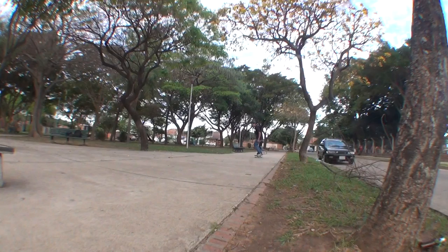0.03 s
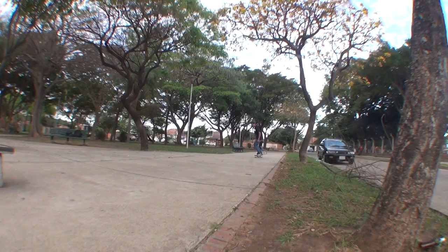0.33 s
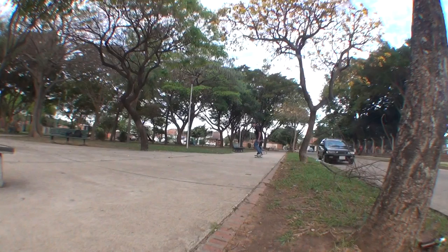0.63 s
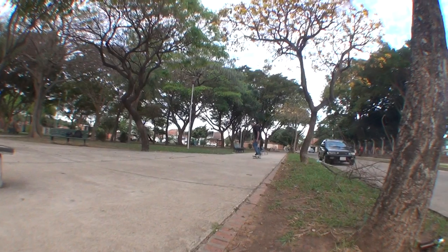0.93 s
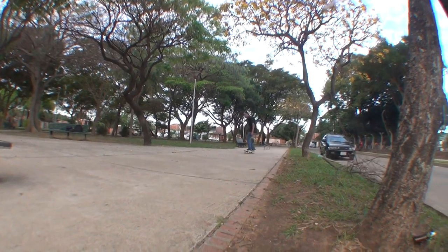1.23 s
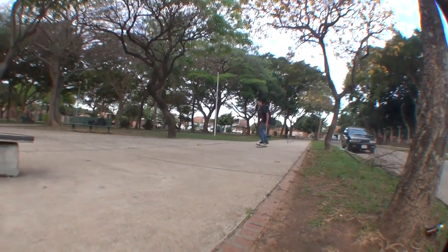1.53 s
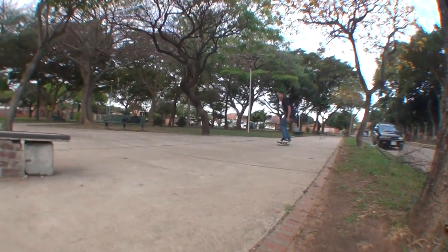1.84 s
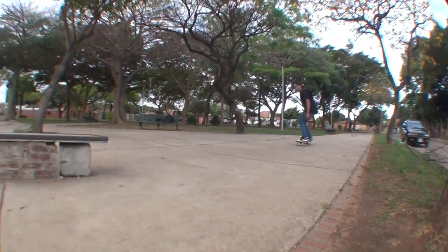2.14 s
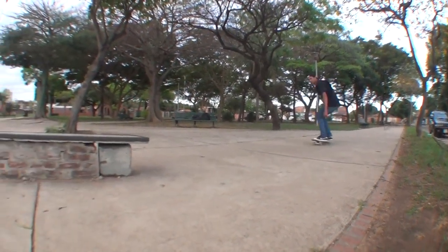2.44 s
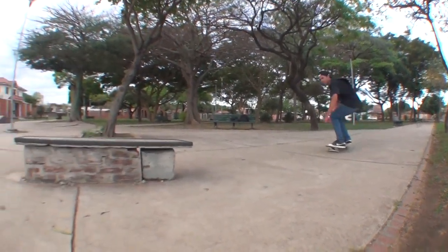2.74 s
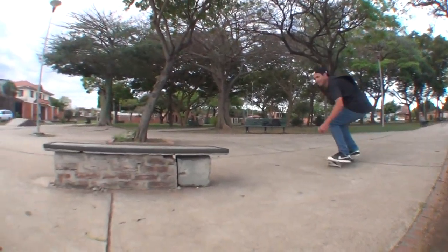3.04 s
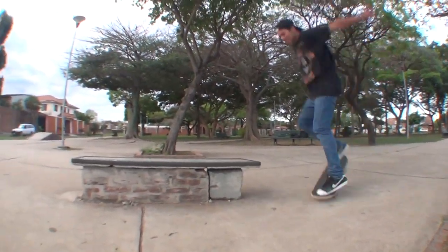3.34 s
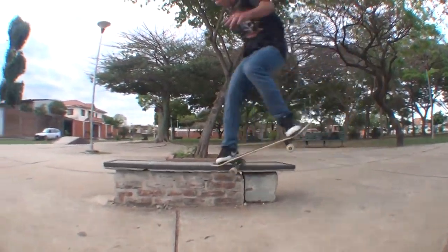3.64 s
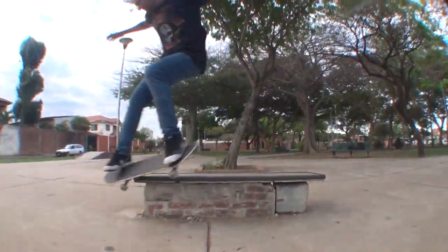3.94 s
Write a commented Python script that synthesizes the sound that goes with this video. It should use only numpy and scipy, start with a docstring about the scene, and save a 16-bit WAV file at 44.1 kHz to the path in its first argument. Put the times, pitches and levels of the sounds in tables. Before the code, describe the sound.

A skateboard rolls closer over concrete, pops up and grinds loudly along a stone ledge.

```python
"""A skateboard rolls closer over concrete paving, jumps and grinds along a stone ledge.
Surface roughness drives wheels and deck into broadband vibration, and the two axles clack across joints.
The deck booms as the rider crouches, the tail pops, a shoe rasps over the grip tape, and the board
slams down and chatters. Friction on the edge excites the resonances of one metal truck.
Short reflections surround the board, and a limiter holds down the loudest blows."""
import sys
import numpy as np
from scipy import signal
from scipy.fft import rfft, irfft
from scipy.io import wavfile
from scipy.ndimage import uniform_filter1d, map_coordinates

SR = 44100
rng = np.random.default_rng(int(sys.argv[2]) if len(sys.argv) > 2 else 0)


def wrap_up_sound(samples):
    """Save the sound to the file named by the first command line argument, as 16-bit audio."""
    columns = np.atleast_2d(samples).T
    # keep every value between -1 and 1, then stretch to whole-number steps
    tamed = np.clip(columns, -1, 1)
    steps = np.round(tamed * 32767).astype(np.int16)
    wavfile.write(sys.argv[1], SR, steps)


N = 176400
T = np.arange(N) / SR


def amp(db):
    """Amplitude ratio of a level in decibels."""
    return 10 ** (np.asarray(db) / 20)


def unit(x):
    """Normalisation to rms 1."""
    return x / np.sqrt(np.mean(x ** 2) + 1e-20)


def decay(t, t60):
    """Exponential damping: 60 dB in t60 seconds."""
    return np.exp(-np.log(1000) * t / t60)


def curves(table):
    """Linear interpolation of each column of a time table at every sample."""
    s, *columns = np.transpose(table)
    return [np.interp(T, s, column) for column in columns]


def read(points, hz):
    """Interpolation on a logarithmic frequency axis."""
    f, value = np.transpose(points)
    return np.interp(np.log(hz + 1e-6), np.log(f), value)


def colour(x, spectrum, centre=1):
    """Zero-phase filtering by a spectrum whose frequencies are multiplied by centre."""
    hz = np.fft.rfftfreq(len(x), 1 / SR)
    return irfft(rfft(x) * amp(read(spectrum, hz / centre)), len(x))


def add(mix, s, sound):
    """Superposition of a sound starting at s seconds."""
    part = mix[round(s * SR):][:len(sound)]
    part += sound[:len(part)]


def waver(depth_db, top_hz):
    """Random modulation: a factor near 1 that fluctuates at rates from 2 Hz to about top_hz."""
    hz = np.fft.rfftfreq(N, 1 / SR)
    slow = rfft(rng.standard_normal(N)) * (hz > 2) / (1 + (hz / top_hz) ** 4)
    return amp(depth_db * unit(irfft(slow, N)))


def grit(per_s, spread_db, share):
    """Shot noise of tiny impacts carries a share of the power; Gaussian rubbing noise carries the rest."""
    impacts = (rng.random(N) < per_s / SR) * rng.choice([-1, 1], N)
    sizes = amp(spread_db * np.minimum(rng.exponential(1, N), 3.7))
    return np.sqrt(share) * unit(impacts * sizes) + np.sqrt(1 - share) * rng.standard_normal(N)


def burst(spectrum, t60, centre=1, size=8192):
    """A struck body with many close modes responds as decaying noise, starting near rms 1."""
    t = T[:size]
    envelope = np.minimum(t / 0.00046, 1) * decay(t, t60)
    noise = colour(rng.standard_normal(size), spectrum, centre)
    return unit(noise * envelope) * np.sqrt(np.mean(envelope ** 2))


def mode(hz, t60, rise_s, size=8192):
    """Free vibration of one mode: a damped sinusoid with a finite rise."""
    t = T[:size]
    return np.sin(2 * np.pi * hz * t) * np.minimum(t / rise_s, 1) * decay(t, t60)


def resonate(drive, modes):
    """Forced vibration of sharp resonances sharing one drive; rms 1."""
    out = np.zeros(N)
    for hz, bandwidth, db in modes:
        pole = np.exp((-np.pi * bandwidth + 2j * np.pi * hz) / SR)
        out += amp(db) * unit(signal.lfilter([1], [1, -pole], drive).imag)
    return unit(out)


def reflections(x, t60, size=16384):
    """Scattering from paving, ledge and trees: convolution with sparse, decaying echoes."""
    t = T[:size]
    signs = rng.choice([-1, 1], size)
    arrivals = (rng.random(size) < 2000 / SR) * (t > 0.002)
    echoes = signs * arrivals * decay(t, t60)
    return signal.oaconvolve(x, echoes / np.linalg.norm(echoes))[:N]


# whirr of the bearings (t/s, level/dB)
WHIRR_LEVELS = [(1.2, -50), (1.7, -58), (2.5, -63.5), (2.9, -48)]
def bearings(centre_hz=4407):
    """Random frequency and amplitude modulation make the bearings' tone wander and swell."""
    hz = centre_hz * waver(depth_db=0.15, top_hz=12) * waver(depth_db=0.25, top_hz=400)
    tone = np.sin(2 * np.pi * np.cumsum(hz) / SR) * waver(depth_db=3, top_hz=22)
    return amp(curves(WHIRR_LEVELS)[0]) * unit(tone)


# spectrum of a sole on grip tape (f/Hz, level/dB)
SHOE_SPECTRUM = [(400, -27), (900, -19), (1300, 3), (2000, -8), (2800, -8), (4400, -12), (6000, -42),
                 (10000, -23), (16000, -40)]
def shoe(start_s=3.46, release_s=3.63, fade_s=0.058):
    """Sliding friction: a sole rasps up the grip tape while the board is in the air."""
    stroke = (T > start_s) * np.exp(-np.maximum(T - release_s, 0) / fade_s)
    rasp = colour(grit(per_s=1100, spread_db=5.5, share=0.9), SHOE_SPECTRUM)
    return amp(-40) * stroke * unit(rasp)


# spectrum of the finest grit (f/Hz, level/dB)
FINE_SPECTRUM = [(3000, -15), (5500, -13), (7300, 4), (8600, 0), (11000, -6.5), (16000, -12.5)]
# lag of a near reflection as the angle to the board changes (t/s, delay/ms)
REFLECTION_DELAY = [(.1, 0.55), (0.9, 0.58), (1.7, 0.41), (2.5, 0.38), (3, 0.335), (3.4, .36)]
def fine_hiss(sand):
    """Interference with a near reflection comb-filters the treble of the grit; rms 1."""
    direct = colour(sand, FINE_SPECTRUM)
    delay_s = curves(REFLECTION_DELAY)[0] / 1000
    reflected = map_coordinates(direct, [(T - delay_s) * SR], order=3)
    return unit(direct + 0.36 * reflected)


# response of wheels and deck (f/Hz, level/dB)
ROAR_SPECTRUM = [(60, -58), (140, -5), (230, 0), (320, 0.5), (400, -6), (490, -9), (640, -6), (800, -10.5),
                 (970, -8.5), (1200, -18.5), (1600, -21), (2200, -28.5), (4000, -32.5), (16000, -96)]
# low drone of the deck within the roar (t/s, gain/dB)
DRONE_GAIN = [(.3, -5.5), (1.4, 0.5), (2.6, 2)]
def roar(drone_top_hz=368):
    """Rough concrete forces wheels and deck to vibrate; the low drone fills in as the board nears."""
    ground = grit(per_s=2500, spread_db=4.5, share=0.45) * waver(depth_db=0.88, top_hz=32)
    vibration = unit(colour(ground, ROAR_SPECTRUM))
    hz = np.fft.rfftfreq(N, 1 / SR)
    drone = irfft(rfft(vibration) / (1 + (hz / drone_top_hz) ** 10), N)
    return vibration + (amp(curves(DRONE_GAIN)[0]) - 1) * drone


# the approach (t/s, rumble level/dB, roar gain/dB, hiss level/dB, fine hiss level/dB, leftward pan/dB)
ROLL = [(.07, -40.5, -33.5, -49.5, -62.5, -2.5), (.3, -36, -31, -48, -59.5, -2.5),
        (.55, -39, -30, -47, -58.5, -3), (.9, -39, -29, -46.5, -58.5, -3),
        (1.25, -36, -30.5, -43, -58, -3.5), (1.6, -38.5, -31.5, -47.5, -58, -4),
        (2.05, -37, -31.5, -45, -57.5, -5.5), (2.55, -35.5, -29.5, -44, -53, -7.5),
        (2.9, -35.5, -29, -42.5, -49, -9), (3.25, -33, -29.5, -45, -47.5, -7),
        (3.45, -40.5, -31, -38.5, -51, -7), (3.62, -36.5, -38, -43.5, -67, -3.5),
        (4, -63, -40.5, -60, -60, -2)]
# spectra of the low rumble and of grit under the wheels (f/Hz, level/dB)
RUMBLE_SPECTRUM = [(30, -48), (58, -3.5), (72, -4), (95, -1.5), (120, 1), (160, -7), (230, -4), (400, -48),
                   (1000, -78)]
HISS_SPECTRUM = [(400, -1), (1500, 1.5), (2200, -4), (2800, -3), (3600, -5.5), (4300, -0.5), (5000, -8.5),
                 (5600, -5), (6400, -13), (9000, -23.5), (16000, -49)]
# scuffs over coarse patches (t/s, half-length/s, level/dB)
SCUFFS = [(0.277, 0.031, -39.5), (0.402, .008, -38.5), (1.083, 0.02, -36), (2.64, 0.01, -38.5)]
def rolling():
    """Rolling noise from surface roughness: rumble, roar and hissing grit, with the bearings' whirr."""
    rumble_db, roar_db, hiss_db, fine_db, _ = curves(ROLL)
    sand = grit(per_s=2500, spread_db=4.5, share=0.33) * waver(depth_db=1.27, top_hz=25)
    scuffs = sum(amp(db) * np.exp(-((T - s) / half) ** 2) for s, half, db in SCUFFS)
    hiss = np.hypot(amp(hiss_db), scuffs) * unit(colour(sand, HISS_SPECTRUM))
    rumble = amp(rumble_db) * unit(colour(rng.standard_normal(N), RUMBLE_SPECTRUM))
    return rumble + amp(roar_db) * roar() + hiss + amp(fine_db) * fine_hiss(sand) + bearings()


# boom of the deck under the crouching rider (t/s, level/dB)
BOOM_LEVELS = [(2.95, -43), (3.03, -29.5), (3.09, -31.5), (3.16, -25.5), (3.19, -40), (3.24, -22.5),
               (3.29, -36), (3.37, -67)]
def crouch(high_hz=166.9, low_hz=124.8, sag_start_s=3.07, sag_hz_per_s=530):
    """A mode of the loaded deck booms unevenly, its frequency sagging as the rider sinks."""
    hz = np.clip(high_hz - sag_hz_per_s * (T - sag_start_s), low_hz, high_hz)
    hz *= waver(depth_db=0.5, top_hz=40.4)
    boom = np.sin(2 * np.pi * np.cumsum(hz) / SR) * waver(depth_db=1, top_hz=35)
    return amp(curves(BOOM_LEVELS)[0]) * (T > BOOM_LEVELS[0][0]) * unit(boom)


# axles crossing joints (t/s, second wheel's lag/s, thump f/Hz, thump level/dB, clack f/Hz,
# clack level/dB, metal tick level/dB, knock t60/s, truck ring f/Hz)
JOINTS = [(0.6604, 0.0034, 503, -31, 1030, -13.5, -23, 0.025, 4540),
          (0.7677, 0.0036, 624, -32, 1600, -17, -22.5, 0.052, 4480),
          (1.3950, 0.0079, 309, -9, 1020, -16, -24, 0.01, 4250),
          (1.5080, 0.0026, 209, -16.5, 836, -18.5, -26, 0.023, 4340),
          (2.1601, 0.0015, 365, -12.5, 1020, -20, -50, 0.022, 4400),
          (2.2834, 0.0012, 324, -12, 1740, -19, -44, .003, 4400),
          (2.4105, .002, 304, -20, 1570, -20.5, -29.5, 0.015, 5750),
          (2.9661, 0.0072, 300, -13.5, 1000, -16, -32.5, .015, 4500),
          (3.0975, 0.0082, 270, -11.5, 864, -12.5, -27, 0.01, 4540)]
# spectrum of a wheel's clack (f/centre frequency, level/dB)
CLACK_SPECTRUM = [(.1, 3), (.4, 5), (.75, 3), (1, 7), (1.25, -7.5), (1.8, -15), (3.5, -17.5), (16, -46)]
# spectra of a metal tick and of a sharp crack against paving or ledge (f/Hz, level/dB)
TICK_SPECTRUM = [(800, 18.5), (2500, 3), (3200, -2), (3700, -0.5), (4450, 10.5), (5000, -16), (5600, 9),
                 (6400, -18), (7500, -12), (11000, -20), (16000, -33)]
CRACK_SPECTRUM = [(1000, -33), (3800, 6), (5500, -1), (7000, 0.5), (10000, -13), (12000, -13), (16000, -26)]
def joints(drop_s=0.00477, second_wheel_db=-3.5):
    """Impact excitation: the wheels drop into a joint, then strike its far edge and ring the truck."""
    out = np.zeros(N)
    for s, lag, thump_hz, thump_db, clack_hz, clack_db, tick_db, knock_t60, ring_hz in JOINTS:
        add(out, s - drop_s, amp(thump_db) * mode(thump_hz, t60=0.042, rise_s=0.0013))
        add(out, s, amp(clack_db - 0.5) * mode(clack_hz, knock_t60, rise_s=0.00041))
        for hz in ring_hz * rng.uniform(0.96, 1.04, 3):
            add(out, s, amp(tick_db - 9) * mode(hz, t60=0.074, rise_s=0.002))
        add(out, s, amp(tick_db - 5.5) * burst(CRACK_SPECTRUM, t60=0.025))
        for wheel_s, gain in ((s, 1), (s + lag, amp(second_wheel_db))):
            clack = amp(clack_db) * burst(CLACK_SPECTRUM, t60=0.029, centre=clack_hz)
            tick = amp(tick_db) * burst(TICK_SPECTRUM, t60=0.063)
            add(out, wheel_s, gain * (clack + tick))
    return out


# the tail scraping the paving as it pops (t/s, level/dB)
TAIL_SCRAPES = [(3.349, -25), (3.360, -24), (3.368, -22.5)]
# spectrum of a scrape (f/Hz, level/dB)
SCRAPE_SPECTRUM = [(800, 0.5), (2500, -8), (3600, -4), (4600, 7.5), (5500, -7), (6300, -15), (7500, -15),
                   (11000, -15), (12000, -25), (16000, -28)]
# blows on wood and truck in the jump and landing (t/s, centre f/Hz, level/dB, t60/s)
BLOWS = [(3.404, 1190, -29.5, 0.12), (3.461, 1170, -22, 0.11), (3.464, 2930, -22, 0.087),
         (3.55, 1510, -29.5, .05), (3.6405, 1380, -19, 0.025), (3.658, 2530, -17.5, 0.025),
         (3.686, 1200, -21, 0.018), (3.693, 2940, -16.5, 0.026), (3.7363, 2960, -21, 0.019),
         (3.757, 1600, -16.5, 0.027), (3.789, 1790, -21, .04), (3.81, 930, -19, 0.052),
         (3.853, 1820, -20, 0.087)]
# spectrum of a blow on wood (f/centre frequency, level/dB)
WOOD_SPECTRUM = [(.1, -15), (.4, 1), (.75, 1.5), (1, 0.5), (1.4, -1.5), (1.8, -16), (3.5, -39), (16, -54)]
# the deck flexing underfoot and on the ledge (t/s, f/Hz, level/dB, t60/s)
DECK_FLEXES = [(.593, 113, -13, 0.064), (1.3998, 310, -11.5, 0.025), (2.151, 440, -16, 0.03),
               (2.376, 238, -11.5, 0.052), (3.067, 161, -33, 0.073), (3.641, 610, -11, 0.065),
               (3.672, 680, -7, 0.039), (3.677, 266, 0, 0.02), (3.708, 260, -5, 0.022),
               (3.774, 214, -10.5, 0.12), (3.815, 242, -6, 0.07), (3.829, 116, -11.5, 0.086)]
def board():
    """Transient response: hard scrapes and blows excite many modes, a soft push one bending mode."""
    out = np.zeros(N)
    for s, db in TAIL_SCRAPES:
        add(out, s, amp(db) * burst(SCRAPE_SPECTRUM, t60=0.041))
    for s, hz, db, t60 in BLOWS:
        add(out, s, amp(db) * burst(WOOD_SPECTRUM, t60, centre=hz))
    for s, hz, db, t60 in DECK_FLEXES:
        add(out, s, amp(db) * mode(hz, t60, rise_s=0.0049))
    return out


# course of the grind (t/s, deck chatter level/dB, stone scrape level/dB, truck ring level/dB)
GRIND = [(3.640, -37, -36, -44), (3.68, -23.5, -30.5, -36), (3.73, -22, -30, -49), (3.78, -24.5, -32, -39),
         (3.83, -23, -32.5, -44), (3.88, -32, -31, -30.5), (3.912, -56, -23, -26), (3.95, -44, -27, -26),
         (4, -20.5, -25.5, -28.5)]
# spectra of the chattering deck, scraped stone and stone dust (f/Hz, level/dB)
CHATTER_SPECTRUM = [(30, -35), (90, -3), (140, -14), (230, 6.5), (320, -2.5), (490, -11.5), (700, -9),
                    (1050, -6.5), (1500, -36), (16000, -85)]
STONE_SPECTRUM = [(100, -36), (350, -23), (700, 7.5), (1100, -10), (1500, 2), (2200, 4.5), (3000, -3.5),
                  (4200, 0), (5100, -14), (16000, -34)]
DUST_SPECTRUM = [(3500, -10), (6500, 1), (12500, -3), (16000, -15)]
# resonances of the truck's ring and thin squeal (f/Hz, bandwidth/Hz, relative level/dB)
TRUCK_MODES = [(450, 35, 4), (736, 13, 5), (1436, 84, 5.5), (1838, 18, 6.5), (1890, 30, -1), (2050, 17, 0),
               (2160, 67, 5), (2590, 33, -4), (2770, 33, 6), (3190, 50, 3), (3660, 260, 6)]
SQUEAL_MODES = [(11630, 46, 2), (12000, 110, -4)]
# the truck biting into the stone (t/s, crack level/dB, crack t60/s, squeal level/dB)
BITES = [(3.639, -28, 0.018, -60), (3.6585, -22, 0.024, -36), (3.6947, -22.5, 0.022, -34),
         (3.8385, -26, .035, -46), (3.885, -27, 0.02, -50), (3.908, -30, 0.027, -40),
         (3.9411, -28, 0.15, -35)]
def grind():
    """Friction on crumbling stone forces deck and truck to vibrate; each bite cracks and squeals."""
    chatter_db, stone_db, ring_db = curves(GRIND)
    crumbs = grit(per_s=9000, spread_db=4.5, share=0.56) * waver(depth_db=1.5, top_hz=131)
    surges = sum((T > s) * np.exp(-abs(T - s) / 0.0051) for s, *_ in BITES)
    crumbs *= 1 + 0.3 * surges
    jolts = grit(per_s=300, spread_db=5, share=0.57)
    out = amp(chatter_db) * unit(colour(jolts, CHATTER_SPECTRUM))
    out += amp(stone_db) * unit(colour(crumbs, STONE_SPECTRUM))
    out += amp(ring_db) * resonate(crumbs, TRUCK_MODES)
    out += amp(-41) * unit(colour(crumbs, DUST_SPECTRUM))
    squeal = resonate(crumbs, SQUEAL_MODES)
    for s, crack_db, t60, squeal_db in BITES:
        add(out, s, amp(crack_db) * burst(CRACK_SPECTRUM, t60))
        out += amp(squeal_db) * squeal * (T > s) * decay(abs(T - s), 1.8 * t60)
    return out * (T > GRIND[0][0])


# strength of the direction cue (f/Hz, factor on the pan)
PAN_WEIGHT = [(130, 0), (250, 0.26), (500, 0.84), (1000, 1.1), (2000, 0.89), (4000, 0.53), (12000, 0.12)]
def place(x, pan_db):
    """A level difference between the channels gives direction, mostly at middle frequencies."""
    hz, s, spectra = signal.stft(x, SR, nperseg=512)
    lean_db = read(PAN_WEIGHT, hz)[:, None] * np.interp(s, T, pan_db) / 2
    left_right = np.array([spectra * amp(lean_db), spectra * amp(-lean_db)])
    return signal.istft(left_right, SR)[1][:, :N]


# direction of the grind (t/s, leftward pan/dB)
LEDGE_PAN = [(3.64, -3), (3.76, -2), (3.9, 0.5), (4, -0.5)]
# early reflections, in antiphase between the channels (f/Hz, gain/dB)
SIDE_SPECTRUM = [(50, -26), (125, -17), (500, -8.5), (4000, -11.5), (8000, -12), (12000, -27)]
def scene():
    """Direct and reflected sound superpose as the board comes from the right and ends in front."""
    approach = rolling() + crouch() + joints() + board() + shoe()
    ledge = grind()
    direct = place(approach, curves(ROLL)[4]) + place(ledge, curves(LEDGE_PAN)[0])
    side = colour(reflections(approach + ledge, t60=0.027), SIDE_SPECTRUM)
    reverberation = amp(-12.5) * reflections(approach + ledge, t60=0.21)
    return direct + reverberation + np.array([side, -side])


ONSET_S, CUTOFF_HZ = 0.075, 16400
THRESHOLD_DB, RECOVERY_DB_PER_S, LIMIT_SLOPE, CEILING_DB = -14, 88, 0.52, -4.5
def record(dry):
    """Dynamic compression: after an abrupt onset a limiter ducks and rounds peaks; a low-pass follows."""
    dry = dry * np.clip((T - ONSET_S) / 0.0032, 0, 1)
    power = uniform_filter1d((dry ** 2).mean(0), size=64)
    power_db = 10 * np.log10(abs(power) + 1e-12)
    recovery_db = T * RECOVERY_DB_PER_S
    peak_db = np.maximum.accumulate(power_db + recovery_db) - recovery_db  # held peaks fall steadily
    excess_db = np.maximum(peak_db - THRESHOLD_DB, 0)
    smooth_db = uniform_filter1d(uniform_filter1d(excess_db, size=48), size=32)
    limited = dry * amp(-LIMIT_SLOPE * smooth_db)
    rounded = limited / (1 + (limited / amp(CEILING_DB)) ** 4) ** (1 / 4)
    lowpass = signal.firwin(511, CUTOFF_HZ, window=("kaiser", 9), fs=SR)
    return signal.oaconvolve(rounded, lowpass[None], "same")


dry = scene()
out = record(dry)
wrap_up_sound(out)
```